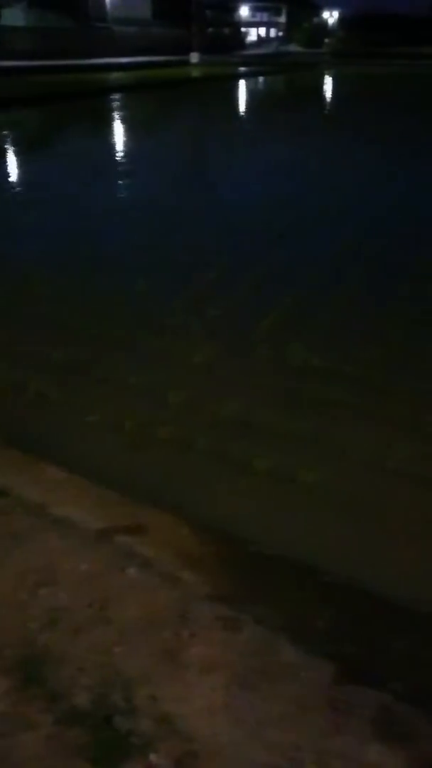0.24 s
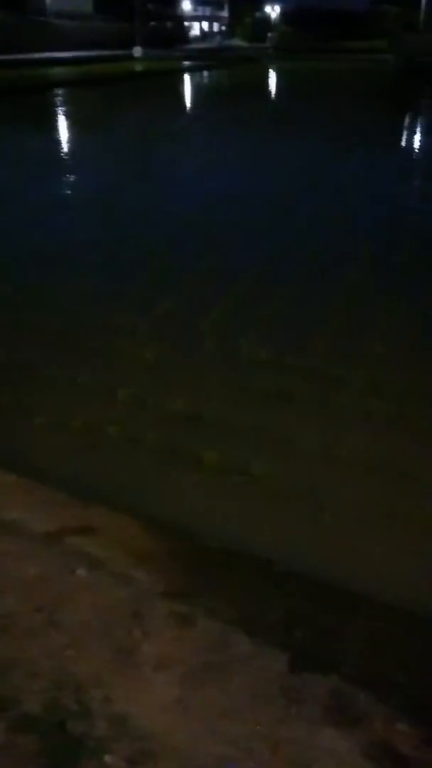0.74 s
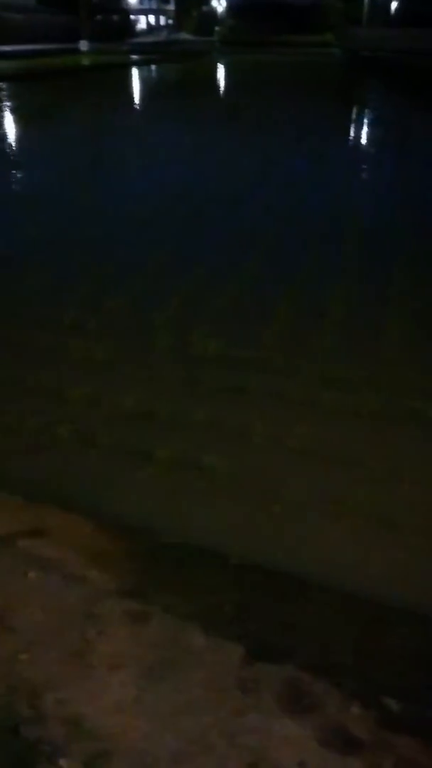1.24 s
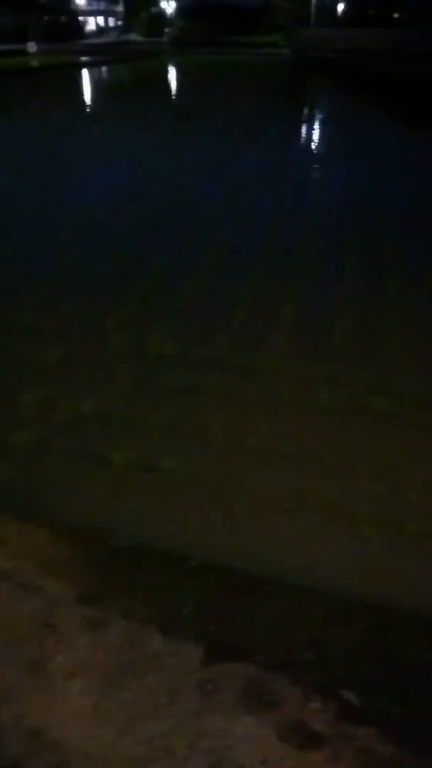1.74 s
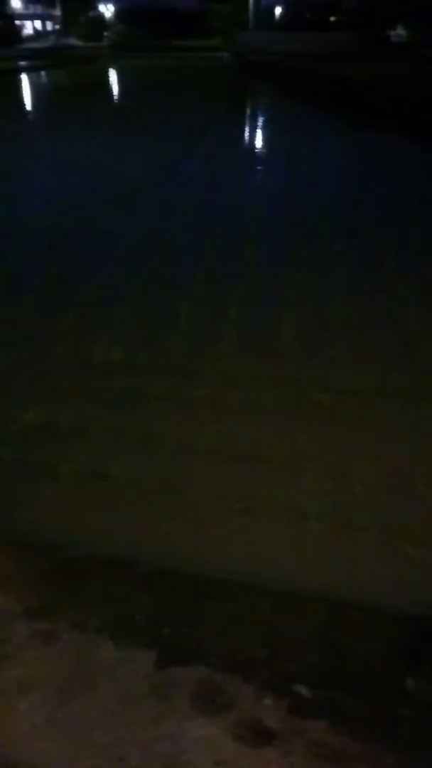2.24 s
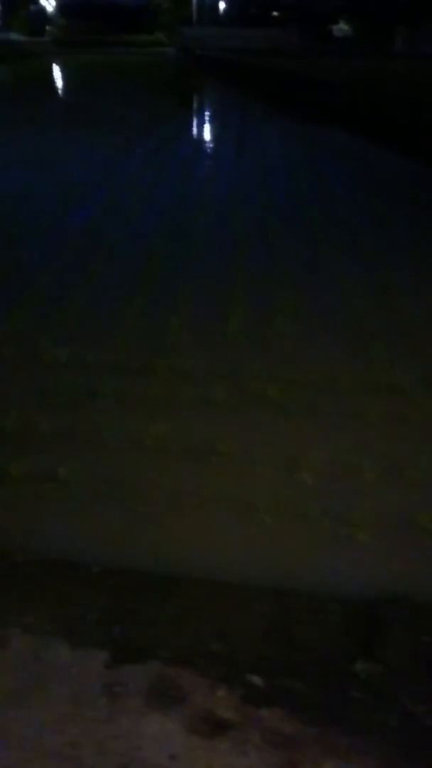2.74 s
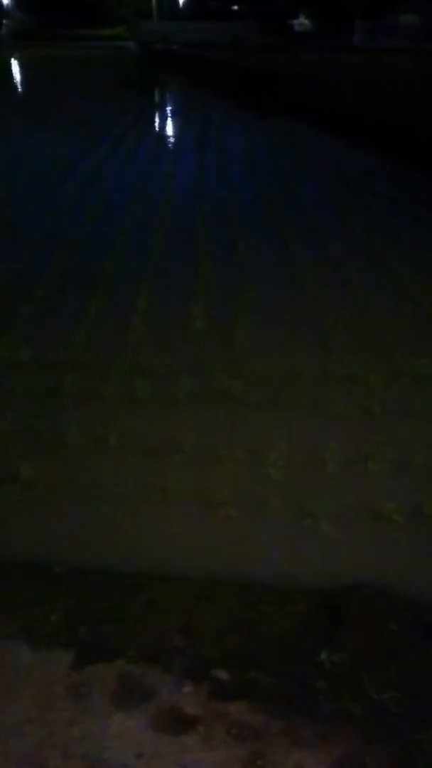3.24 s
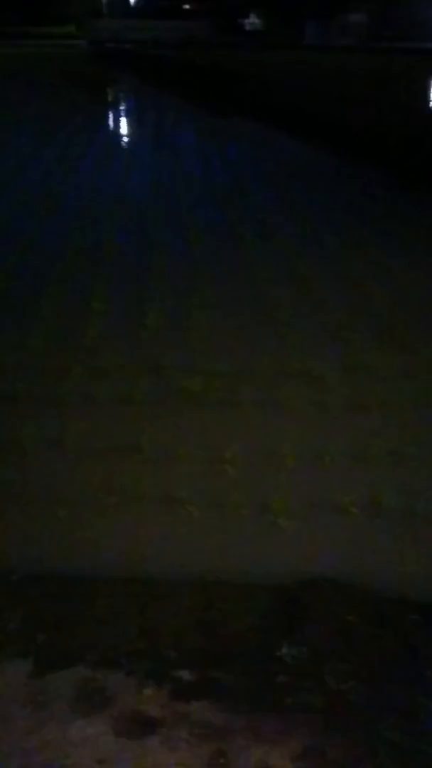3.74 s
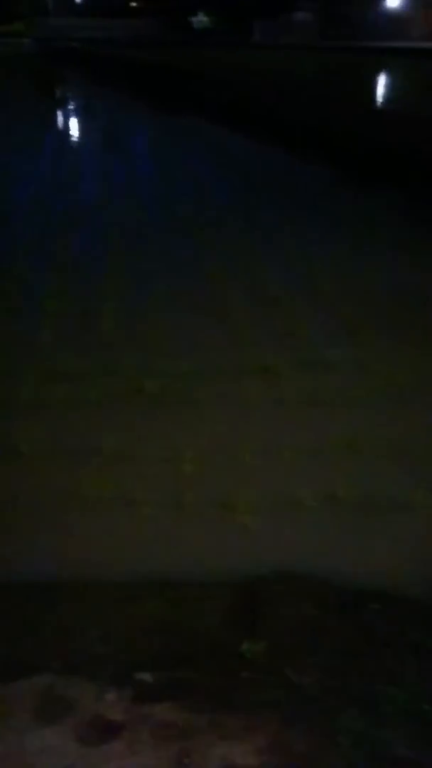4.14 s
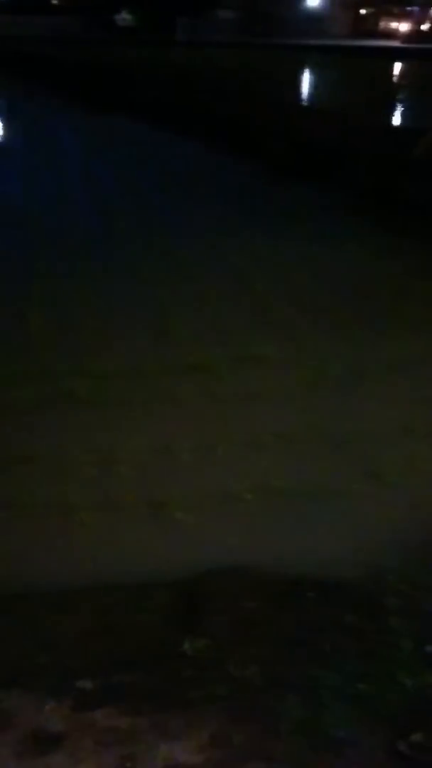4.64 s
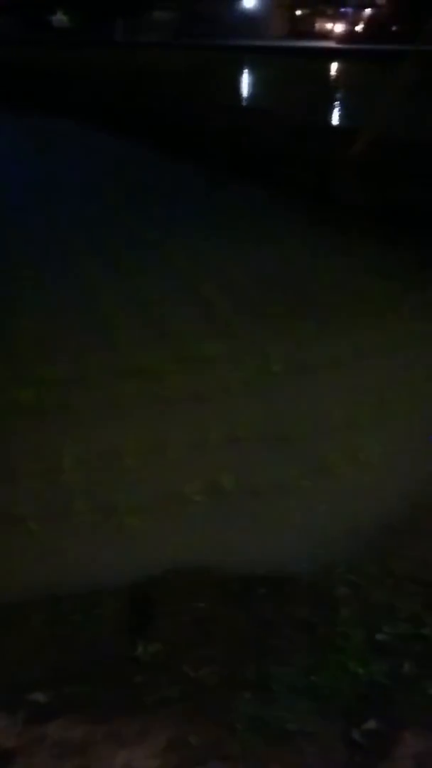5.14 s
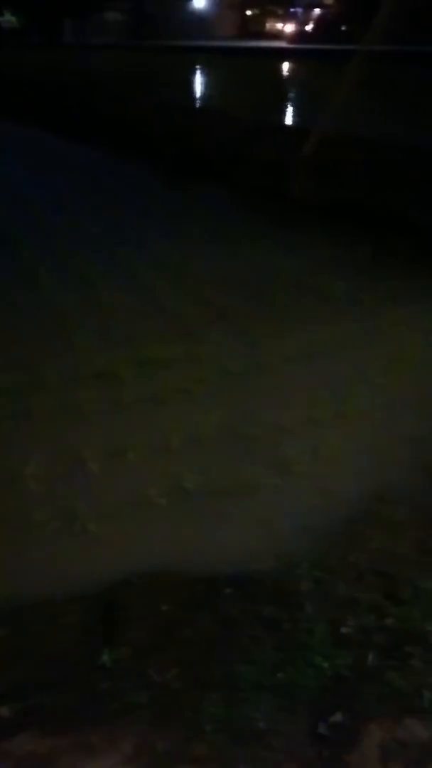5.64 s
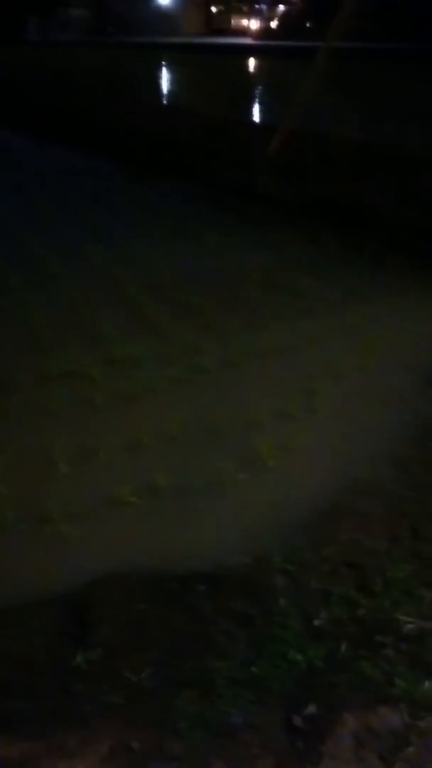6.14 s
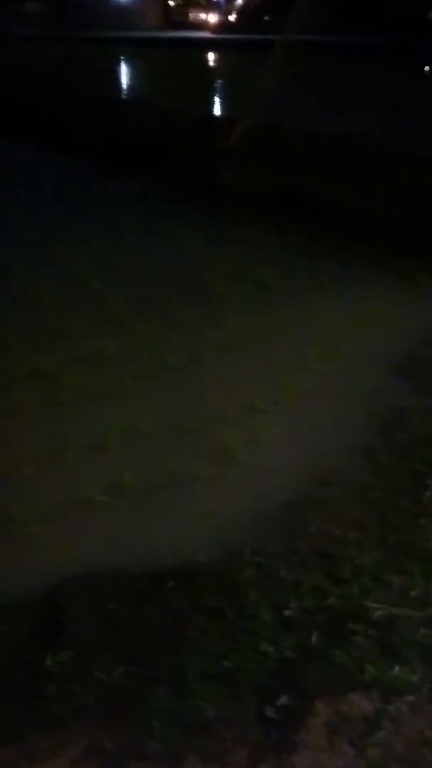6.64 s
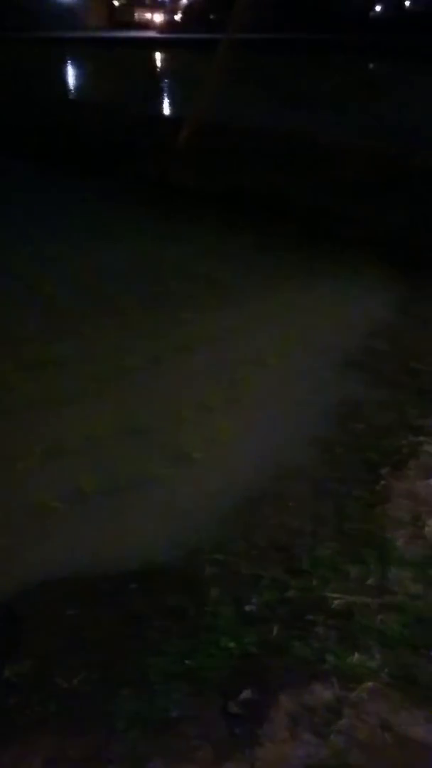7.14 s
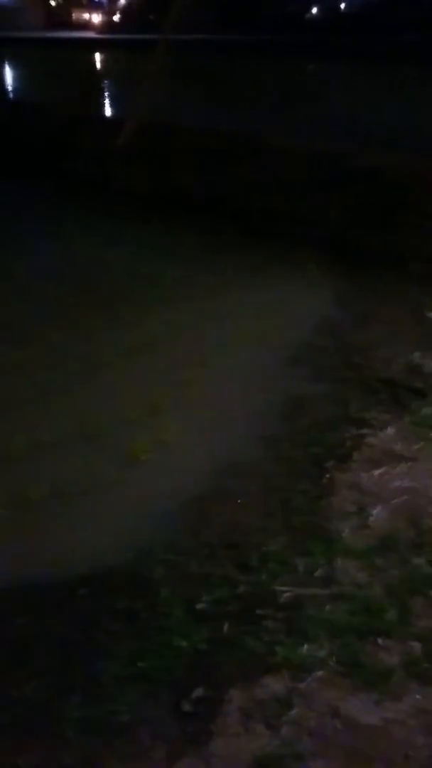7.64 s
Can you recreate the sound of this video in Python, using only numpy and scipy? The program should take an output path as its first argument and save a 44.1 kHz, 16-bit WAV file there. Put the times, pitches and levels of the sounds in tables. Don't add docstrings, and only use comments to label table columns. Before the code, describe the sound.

About six nearby tree frogs call over one another from the first instant, each giving short, dry, pulsed croaks several times a second at slightly different pitches. A murmuring crowd of distant frogs fills the gaps. Low wind thumps hit a hand-held phone on a dark bank, stronger on the right early and late, more on the left in the middle. A faint road hums far off.

```python
import sys
import numpy as np
from scipy import signal
from scipy.fft import rfft, irfft, next_fast_len
from scipy.io import wavfile
from scipy.ndimage import uniform_filter1d

SR = 44100
rng = np.random.default_rng(int(sys.argv[2]) if len(sys.argv) > 2 else 0)


def transcribe(u):
    v = np.clip(np.atleast_2d(u).T, -1, 1)
    q = np.round(v * 32767).astype(np.int16)
    wavfile.write(sys.argv[1], SR, q)


def level_to_linear(level):
    exponent = np.asarray(level, float) / 20
    return 10 ** exponent


N = 347067

SIDES = np.array([[0.5], [-0.5]])


def colour(x, points):
    hz, db = np.transpose(points)
    size = next_fast_len(N + 8192, True)
    bins = np.log(np.arange(size // 2 + 1) * SR / size + 1)
    padded = np.pad(x, [(0, 0), (4096, size - N - 4096)], mode="reflect")
    gain = level_to_linear(np.interp(bins, np.log(hz), db))
    return irfft(rfft(padded) * gain, size)[:, 4096:4096 + N]


def unit(x):
    return x / np.sqrt(np.mean(x ** 2))


def walk(rate):
    k = int(SR / rate)
    held = np.repeat(rng.standard_normal(N // k + 1), k)
    return 2.0 * uniform_filter1d(uniform_filter1d(held, k), k)[:N]


def road():
    # frequency in Hz, level in dB per Hz.
    road_spectrum = [(60, -21.5), (150, -2), (300, -7.5), (600, -11), (1000, -13), (2200, -12),
                     (4500, -25.5), (10500, -52.5)]
    mid, side = colour(rng.standard_normal((2, N)), [(25, -39.0)] + road_spectrum)
    both = mid + level_to_linear(-10.5) * side * np.array([[1], [-1]])
    return unit(both) * level_to_linear(-55 + np.array([[-1.5], [1.5]]))


def gusts(table):
    edge_s, edge_db, calm_db = 0.056, 10, -62
    t = np.arange(0, N + 64, 64) / SR
    power = level_to_linear(2 * calm_db)
    for s, db, hold, sag_db in table:
        away = np.maximum(np.maximum(s - t, t - s - hold), 0) / edge_s
        sag = sag_db * np.clip((t - s) / max(hold, 0.01), 0, 1)
        power = power + level_to_linear(2 * (db - edge_db * away ** 1.16 - sag))
    return np.interp(np.arange(N) / SR, t, 10 * np.log10(power))


def wind():
    # start in seconds, level in dB, hold in seconds, sag over the
    # hold in dB.
    left_gusts = [(0.11, -31, 0.0092, -4), (0.89, -54.5, 0.66, 17), (1.52, -67, 0, -2),
                  (2.61, -45, 0.27, -3.5), (2.73, -35, 0, 26), (3.14, -54, 1.95, -21.5),
                  (3.79, -40.5, 0.0, -3), (4.08, -36.5, 0.006, 7.5), (4.3, -24, 0.21, 9.5),
                  (4.6, -35.5, 0.11, 19), (4.75, -28, 0.019, -5.5), (5.15, -49, 1.6, -2),
                  (5.42, -38, 0, 11), (5.6, -33, 0.096, -4.5), (5.83, -33.5, 0.14, -0.5),
                  (5.99, -29.5, 0.027, 19), (6.13, -32, 0.3, -2), (6.15, -27, 0.039, 12.5),
                  (6.96, -30.5, 0, -2), (7.0, -35, 0.14, 23), (7.24, -37, 1.3, -4),
                  (7.56, -41, 0.033, -7.5)]
    right_gusts = [(0.18, -24, 1.016, 15), (0.21, -22, 0.117, 8), (0.69, -41, 0.0, -15),
                   (0.96, -27.5, 0.0078, 2), (1.29, -53.5, 0.097, -4), (1.62, -42.5, 0.82, 8),
                   (1.94, -30, 0.12, 16), (2.06, -46.5, 1.225, -9), (2.22, -35.5, 0.0, -6),
                   (2.55, -37, 0, -4), (3.02, -29.5, 0.186, 1), (3.84, -47, 1.1, -5),
                   (4.06, -43, 0.036, -2.5), (4.35, -35, 0.33, -5), (4.87, -50, 0.84, -0.5),
                   (5.33, -49, 0.78, 4), (6.1, -45.5, 0.19, 18), (6.35, -26, 0.62, 15.5),
                   (6.72, -46, 0.05, -14.5), (7.25, -27, 0.057, -6.5), (7.3, -21, 0, 19),
                   (7.46, -20.5, 0.26, 10.5),
                   (7.721, -23.5, 0.16, 0.82)]
    # frequency in Hz, level in dB per Hz.
    eddy_spectrum = [(15, -34.5), (25, -27.5), (49, 7.5), (91, 7), (257, -18.5), (339, -29), (467, -58.5),
                     (568, -50.5), (700, -39.5), (910, -65), (1540, -120)]
    # time in seconds, peak in dB, left minus right in dB.
    slap_events = [(0.144, -38.5, -24.5), (0.22, -32, -35.5), (0.681, -36, -24.5), (0.948, -38, -26.5),
                   (3.025, -44.5, -29), (4.314, -31, 20.5), (4.405, -34, 18.5), (4.509, -36, 2.5),
                   (4.756, -36, 11.5), (4.865, -37, 22), (5.085, -43.5, 11), (6.284, -35, 19),
                   (6.989, -43, 36.5), (7.282, -21.5, -18.5), (7.415, -30.5, -23.5), (7.452, -32.5, -20),
                   (7.532, -29.5, -21), (7.634, -28, -26), (7.14, -41, -6.5)]
    slap_spectrum = [(30, -6.0), (70, 41.5), (200, 43.0), (450, 19.5), (1000, -10.0), (3000, -34)]  # (Hz, dB)

    port_db = np.array([gusts(left_gusts), gusts(right_gusts)])
    lumps = level_to_linear(np.array([0.38 * walk(35) + 2.8 * walk(110) for _ in range(2)]))
    eddies = unit(colour(lumps * rng.standard_normal((2, N)), eddy_spectrum))
    soft = signal.sosfiltfilt(signal.butter(2, 170, fs=SR, output="sos"), eddies)
    bright = np.clip(level_to_linear(0.5 * (port_db + 34.5)), 0, 1.5)
    slaps = np.zeros((2, N))
    for s, db, side_db in slap_events:
        slaps[:, int(s * SR) + 150] = -level_to_linear(db + side_db * SIDES[:, 0])
    return level_to_linear(port_db) * (soft + bright * (eddies - soft)) + colour(slaps, slap_spectrum)


def thumps():
    # time in seconds, peak in dB, swing rate in Hz, left minus right in dB.
    thump_events = [(0.09, -36, 92, 13), (0.138, -34.5, 74.5, -7), (0.167, -22, 90.4, -24),
                    (0.504, -24, 92, -39), (0.591, -28, 95, -32), (0.682, -23, 122.3, -37),
                    (0.828, -27, 92.6, -26), (0.944, -28, 73.2, -22), (1.914, -25.5, 79.7, -34),
                    (2.059, -46, 71.8, -20), (2.516, -38.5, 73, -16), (2.597, -29, 98.7, -11.5),
                    (2.691, -35.5, 103.5, 17), (3.017, -29.5, 76.7, -26), (3.788, -33, 108, 16.0),
                    (4.038, -32, 62.5, -6), (4.18, -33, 96.5, 12.5), (4.289, -40, 299, 6),
                    (4.289, -27, 107.3, 7.5), (4.37, -30.5, 123.5, 4.5), (4.553, -26, 102, 4),
                    (4.707, -29, 120, 11.5), (4.856, -23.5, 106, 25.0), (4.933, -23, 83.4, 21),
                    (5.051, -34.5, 75.4, 7.5), (5.556, -33, 79.2, 4), (5.648, -28.5, 70.5, 31),
                    (5.803, -40.5, 83.4, 12), (5.955, -31.5, 96, 19), (6.097, -27, 70.3, 15.5),
                    (6.216, -32.5, 121, 18), (6.346, -37.5, 51.1, -4.5), (6.347, -31, 102.4, -5.0),
                    (6.466, -30.5, 79.5, -6), (6.732, -20, 88.2, -25), (6.874, -31, 86.1, -12),
                    (6.982, -39, 51, 21), (6.982, -29, 120, 28), (7.084, -39, 75.6, 23.5),
                    (7.14, -35.5, 90, -10.5), (7.273, -19.5, 91.2, -14.5), (7.397, -18, 84, -7),
                    (7.522, -19, 96.6, -15), (7.637, -17, 86.3, -15.5), (7.741, -20, 66.8, -21)]
    rise_s, decay_s, sag = 0.0043, 0.019, 0.25
    out = np.zeros((2, N + SR))
    t = np.arange(SR // 6) / SR
    envelope = (1 - np.exp(-t / rise_s)) * np.exp(-t / decay_s) * (1 - 6 * t)
    for s, db, hz, pan_db in thump_events:
        swing = -np.sin(2 * np.pi * hz * t * (1 - sag * t / 0.12)) * envelope
        share = np.array([[1], [level_to_linear(-pan_db)]]) / (1 + level_to_linear(-pan_db))
        start = int(s * SR)
        out[:, start:start + len(t)] += 4 * level_to_linear(db - 4) * share * swing
    return out[:, :N]


def field(x, t60_s, wet_db):
    t = np.arange(SR // 4) / SR
    tail = rng.standard_normal((2, len(t))) * level_to_linear(-60 * t / t60_s) * np.clip(t / 0.0017, 0, 1)
    tail *= level_to_linear(wet_db) / np.sqrt(np.sum(tail ** 2, axis=1, keepdims=True))
    return x + signal.fftconvolve(x, tail, axes=1)[:, :N]


def crowd(count=300):
    # time in seconds, crowd level in dB.
    crowd_levels = [(0.0, -41.5), (0.59, -47), (1.2, -47), (1.47, -49), (2.2, -46), (2.48, -46), (2.8, -44),
                    (3.3, -44), (3.92, -44), (4.4, -44.5), (5.13, -46), (5.65, -47.5), (6.12, -45.5),
                    (6.39, -50.5), (6.64, -44.5), (6.88, -53.5), (7.14, -47.5), (7.39, -52.5),
                    (7.65, -48.5), (7.87, -43)]
    # time in seconds, delay in samples.
    turn_delays = [(0, 4.7), (4, 8.56), (7.87, 6.3)]
    far_voice = (-1, -22.5, 186, 0.85, 1.1, 0.41)
    when, size, far, side = rng.random((count, 4)).T
    same = np.ones(count)
    s = when * N / SR
    hz = 3000 + 550 * size ** 0.7
    calls = np.c_[s, hz, -4 * far, 0.075 * same, -9 + 9 * side, -1.5 * same, np.outer(same, far_voice)]
    murmur = unit(chorus(calls, lag_scatter=4.7, later=np.interp(s, *np.transpose(turn_delays))))
    return murmur * level_to_linear(np.interp(np.arange(N) / SR, *np.transpose(crowd_levels)) - 5.0)


def croak(t, hz, length, pan_db, low_db, voice, chance):
    upper_levels = [-1, -23.5, -29, -43, -43]
    # multiple of the fold rate, level in dB.
    between = [(1.5, -12), (2.5, -23)]
    rise_s, slip_s, detune_share = 0.00074, 0.00004, 0.003
    open_share, fade_share, fade_db, close_s = 0.18, 0.45, -4.5, 0.0016
    lift4_db, lift6_db, pulse_hz, quicken, opening, glide = voice
    along = np.clip(t / length, 0, 1)

    rate = pulse_hz * (1 + 0.035 * chance[0, 0])
    beats = rate * t * (1 + quicken * (along - 1) / 2)
    pulse = np.clip(beats, 0, len(chance) - 1).astype(int)
    size, slip, detune = chance[pulse].transpose(2, 0, 1)
    age = (beats % 1) / (rate * (1 + quicken * (along - 0.5)))
    age = np.maximum(age - slip_s * np.abs(slip), 0)
    swell = (age / rise_s) ** 2 * np.exp(-age / rise_s) * np.sin(np.pi * (beats % 1)) ** 0.026

    edges = np.interp(along, [0, open_share, 1 - fade_share, 1], [opening, 1, 1, level_to_linear(fade_db)])
    edges = edges * np.clip(t / 0.00027, 0, 1) * np.clip((length - t) / close_s, 0, 1)

    climb = glide * (along ** 0.83 - 0.31 * along ** 3 - 0.5)
    folds = np.pi * hz * age * (1 + climb + detune_share * detune)

    lift_db = {
        4: lift4_db - abs(lift4_db) * np.clip(2 * t / 0.029 - 1.5, 0, 1),
        6: lift6_db - 17.5 * SIDES,
    }
    upper = 0
    for k, db in enumerate(upper_levels, 2):
        level = level_to_linear(db + lift_db.get(k, 0) + 0.49 * (k + 1) * chance[k, 0])
        upper = upper + level * (1.85 * swell) ** min(k - 2, 3) * np.sin(k * folds)
    upper = level_to_linear(pan_db * SIDES) * upper
    for k, db in between:
        upper = upper + level_to_linear(db) * (2.3 * swell) * np.sin(k * folds)

    low_level = level_to_linear(low_db - 7.5 * SIDES + (2 * along - 1))
    low_phase = folds * (1 - (1 - 0.4) * climb) + np.pi * hz * (1 - 0.7) * (t[:1] - t)
    lowest = low_level * (1.95 * swell) ** 0.35 * np.sin(1.0064 * low_phase)
    return 4 * level_to_linear(0.69 * size) * swell * edges * (upper + lowest)


def chorus(calls, lag_scatter, later):
    out = np.zeros((2, N + SR))
    chances = rng.standard_normal((len(calls), 32, 3))
    for (s, hz, db, length, pan_db, low_db, *voice), chance, extra in zip(calls, chances, later):
        start = int(max(s, 0) * SR)
        lag = extra + lag_scatter * chance[1, 1]
        t = (np.arange(int(length * SR) + 40) - np.array([[0], [lag]])) / SR
        out[:, start:start + t.shape[1]] += level_to_linear(db) * croak(t, hz, length, pan_db, low_db, voice, chance)
    return out[:, :N]


def frog(calls, voice, rise):
    s = np.array(calls)[:, 0]
    pan_db, low_db = [np.interp(s * SR, [0, N], voice[k:k + 2]) for k in (0, 2)]
    return np.c_[calls, pan_db, low_db, np.outer(np.ones(len(s)), (*voice[4:], rise))]


def near_frogs():
    # start in seconds, strongest (second) partial in Hz,
    # level in dB, length in seconds.
    deep_calls = [(0.108, 2830, -44.5, 0.079), (0.431, 2824, -43, 0.084), (0.68, 2960, -49, 0.066),
                  (0.735, 2790, -44, 0.092), (0.968, 2930, -49, 0.085), (1.119, 2760, -43, 0.073),
                  (1.497, 2756, -41.5, 0.083), (1.826, 2750, -41.5, 0.081), (2.093, 2770, -42, 0.093),
                  (2.644, 2910, -43.5, 0.082), (2.958, 2900, -47, 0.085), (3.419, 2660, -43.5, 0.1),
                  (3.715, 2860, -50.5, 0.08), (3.871, 2710, -47, 0.11), (4.434, 2820, -43, 0.075),
                  (4.71, 2750, -47, 0.055), (4.77, 2780, -44.5, 0.061), (5.051, 2795, -43, 0.083),
                  (5.378, 2850, -41.5, 0.08), (5.69, 2834, -42, 0.082), (5.98, 2800, -43.5, 0.076),
                  (6.282, 2820, -41, 0.084), (6.599, 2830, -40.5, 0.09), (6.944, 2800, -40.5, 0.078),
                  (7.258, 2820, -42, 0.072), (7.513, 2860, -46.5, 0.091)]
    mellow_calls = [(0, 3180, -39, 0.016), (0.194, 2890, -43, 0.078), (0.562, 3060, -42, 0.061),
                    (0.869, 3050, -41, 0.06), (1.189, 2900, -45.5, 0.058), (1.772, 2950, -42.5, 0.086),
                    (2.068, 3060, -42.5, 0.073), (2.391, 3100, -41.5, 0.059), (2.701, 3300, -46, 0.075),
                    (3.083, 3090, -42.5, 0.11), (3.414, 3200, -41.5, 0.13), (3.665, 3100, -42, 0.096),
                    (3.96, 3130, -43.5, 0.11), (4.335, 3050, -45.5, 0.1), (4.66, 3030, -43, 0.1),
                    (4.948, 2900, -44.5, 0.095), (7.186, 3030, -44, 0.079), (7.752, 2990, -45, 0.11)]
    bright_calls = [(0.008, 3424, -41.5, 0.078), (0.27, 3416, -38.5, 0.082), (0.518, 3364, -39, 0.071),
                    (0.785, 3350, -41, 0.09), (1.08, 3750, -41, 0.057), (1.428, 3250, -42, 0.098),
                    (1.695, 3430, -40.5, 0.094), (1.975, 3516, -40.5, 0.1), (2.305, 3346, -40, 0.11),
                    (2.607, 3380, -40, 0.076), (2.866, 3350, -41.5, 0.12), (3.186, 3290, -44.5, 0.084),
                    (3.422, 3600, -49.5, 0.091), (3.658, 3450, -41.5, 0.082), (3.923, 3190, -41, 0.083),
                    (4.214, 3410, -43, 0.055), (4.458, 3390, -48, 0.088), (4.745, 3385, -39, 0.11),
                    (4.96, 3300, -42, 0.14), (5.259, 3310, -41, 0.1), (5.56, 3510, -48.5, 0.068),
                    (5.887, 3390, -39, 0.14), (6.141, 3420, -38.5, 0.094), (6.418, 3357, -39, 0.1),
                    (6.69, 3290, -39.5, 0.085), (6.94, 3260, -40.5, 0.11), (7.232, 3355, -38, 0.093),
                    (7.511, 3340, -39, 0.069), (7.786, 3376, -43, 0.097)]
    reedy_calls = [(0.097, 3300, -53, 0.075), (0.166, 3260, -49.5, 0.068), (0.354, 3370, -52, 0.065),
                   (0.44, 3310, -53.5, 0.075), (0.594, 3200, -55, 0.071), (1.07, 3260, -51, 0.085),
                   (1.2, 3330, -58, 0.088), (1.3, 3060, -55, 0.052), (2.41, 3100, -55, 0.073),
                   (2.69, 3330, -61, 0.089), (3.34, 3260, -50, 0.072), (3.589, 3380, -47, 0.063),
                   (4.061, 3220, -50, 0.092), (4.3, 3330, -46.5, .07), (4.578, 3270, -46, 0.061),
                   (4.8, 3395, -44, .07), (5.045, 3250, -44, 0.098), (5.294, 3230, -44, 0.082),
                   (5.543, 3290, -42, 0.075), (5.783, 3230, -44, 0.07), (6.026, 3200, -43.5, 0.071),
                   (6.268, 3290, -44, 0.084), (6.509, 3250, -41, 0.068), (6.756, 3280, -42.5, 0.074),
                   (7.02, 3280, -42, 0.074), (7.262, 3150, -44, 0.089), (7.52, 3280, -44.5, 0.091)]
    high_calls = [(0.114, 3780, -47, 0.05), (0.356, 3740, -45, 0.062), (0.6, 3670, -42.5, 0.056),
                  (0.84, 3730, -42.5, 0.05), (1.307, 3590, -40, .062), (1.552, 3610, -40.5, 0.066),
                  (1.845, 3680, -37.5, 0.062), (2.164, 3580, -40, 0.072), (2.528, 3590, -39, .074),
                  (2.865, 3660, -40.5, 0.065), (2.951, 3450, -52, 0.05), (3.02, 3220, -52.5, 0.073),
                  (3.201, 3520, -41, 0.068), (3.525, 3470, -41.5, 0.07), (3.545, 3850, -46.5, .05),
                  (3.8, 3460, -41, .082), (3.83, 3880, -48, .05), (3.891, 3700, -50, 0.057),
                  (4.155, 3460, -42.5, 0.07), (4.165, 3830, -46, .06), (4.499, 3870, -49, .05),
                  (4.819, 3870, -48, .05), (5.14, 3860, -49, .06), (5.47, 3930, -49.5, 0.052),
                  (5.73, 3860, -47, .05), (4.471, 3550, -40, 0.087), (5.125, 3530, -42, 0.075),
                  (5.456, 3500, -42, 0.081), (5.715, 3390, -40.5, 0.078), (6.201, 3410, -40.5, 0.076),
                  (6.452, 3490, -39, .05), (6.72, 3700, -42.5, 0.062), (6.946, 3560, -39.5, 0.071),
                  (7.179, 3510, -42.5, 0.1), (7.428, 3450, -42, 0.13), (7.689, 3640, -45.5, 0.071),
                  (7.827, 3400, -53, 0.047)]
    hollow_calls = [(0.26, 2950, -53, .1), (0.541, 2980, -51, .11), (0.55, 3830, -52, .1),
                    (0.9, 2860, -55, 0.062), (1.074, 3310, -50, .08), (1.199, 2830, -56.5, 0.07),
                    (1.423, 3420, -54, 0.051), (1.478, 2860, -51.5, .11), (2.003, 3430, -58, 0.087),
                    (2.091, 2720, -55, 0.09), (2.7, 2810, -60, .09), (2.84, 3400, -49.5, .08),
                    (2.92, 2900, -60, 0.092), (3.08, 3590, -57, .07), (3.341, 3610, -51, .07),
                    (3.84, 3770, -50.5, .06), (4.071, 3730, -59, .06), (4.34, 3730, -53, 0.059),
                    (4.582, 3720, -53.5, .06), (4.458, 3100, -57, .08), (5.7, 3110, -53.5, 0.11),
                    (7.691, 3440, -60, .06)]
    # left minus right in dB, first and last; lowest partial in dB,
    # first and last; lift of partial 4 in dB, of partial 6 in dB; pulse rate in Hz,
    # pulse speed-up as a share, opening level as a share.
    deep_voice = (-13, -14, -6, -19, -1.5, -6, 200, 0.33, 0.72)
    mellow_voice = (-5.5, -10, -6, -8.5, -2.5, -9.5, 182.5, 0.3, 0.3)
    bright_voice = (-5.5, 0.8, -6, -8, -2.5, 7, 170, 0.45, 0.45)
    reedy_voice = (16.5, 5.5, -4, -2, 11, -8.5, 198, 0.3, 0.5)
    high_voice = (-7.5, 3.5, -4.5, -5.5, 1.5, -10, 186.5, 0.59, 0.5)
    hollow_voice = (-2, 9, 4, 3.5, -5, -8.5, 190, -0.07, .5)
    pitch_rises = (.075, .11, .1, .04, .045, .03)
    port_lags = [(8.1, 8.8, 10.2, 13.1), (7.5, 9.1, 10.6, 11.6), (2.8, 7.2, 10.1, 12.2),
                 (10.1, 8.5, 3.3, .6), (8.3, 9.7, 9.4, 7.4), (7, 8, 8, 9)]

    tables = (deep_calls, mellow_calls, bright_calls, reedy_calls, high_calls, hollow_calls)
    voices = (deep_voice, mellow_voice, bright_voice, reedy_voice, high_voice, hollow_voice)
    calls = np.vstack([frog(*f) for f in zip(tables, voices, pitch_rises)])
    later = []
    for table, lags in zip(tables, port_lags):
        s = np.array(table)[:, 0]
        later.append(np.interp(s * SR, np.linspace(0, N, len(lags)), lags))
    return level_to_linear(2) * chorus(calls, lag_scatter=1.0, later=np.hstack(later))


def scene():
    near = field(near_frogs(), t60_s=0.11, wet_db=-15)
    far = field(crowd(), t60_s=0.36, wet_db=4.5)
    return near + far + wind() + thumps() + road()


def roll_off(x):
    return signal.sosfilt(signal.butter(12, 11090, fs=SR, output="sos"), x)


def record(dry):
    # frequency in Hz, gain in dB.
    microphone = [(25, -45.5), (40, -12.5), (55, -2), (3800, 0.5), (4600, -3), (9000, -2), (9800, -23.5),
                  (10600, -2.5), (11300, -11)]
    return roll_off(colour(dry, microphone))


dry = scene()
out = record(dry)
transcribe(out)
```